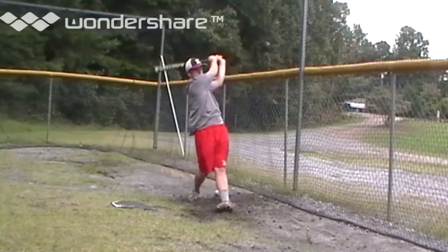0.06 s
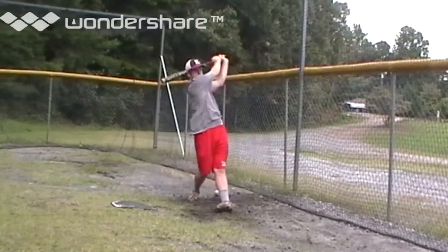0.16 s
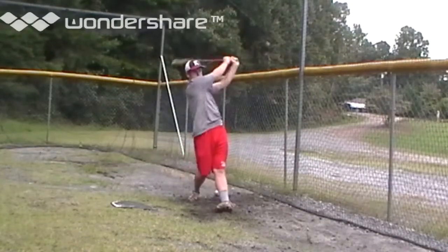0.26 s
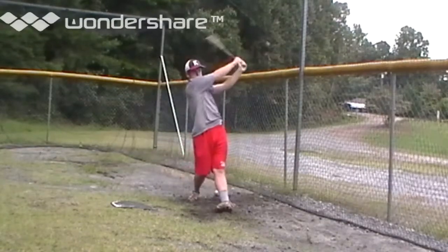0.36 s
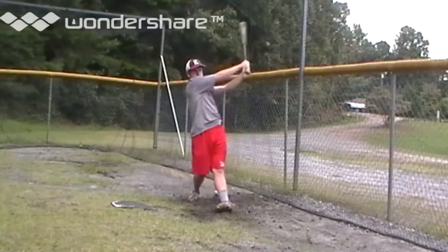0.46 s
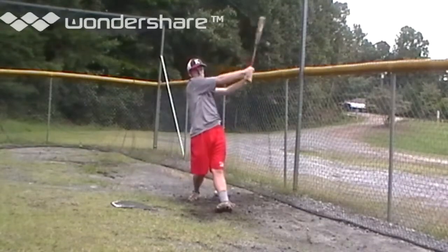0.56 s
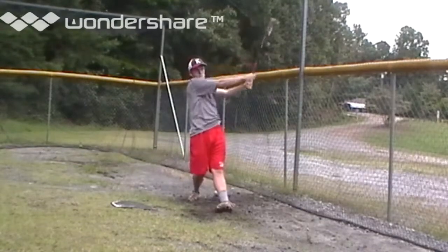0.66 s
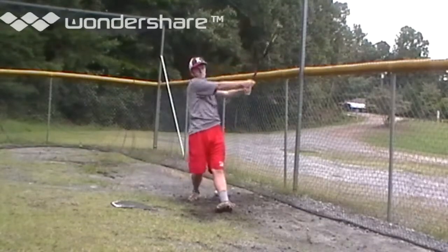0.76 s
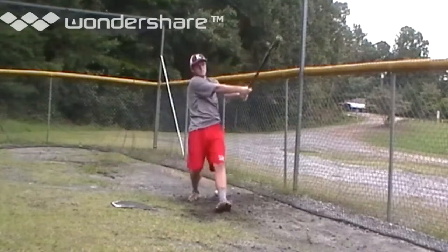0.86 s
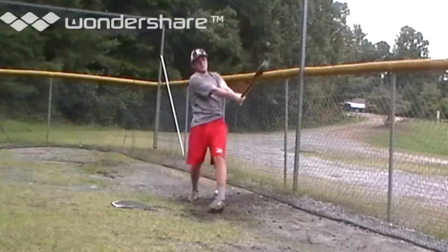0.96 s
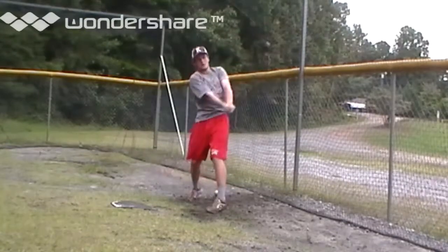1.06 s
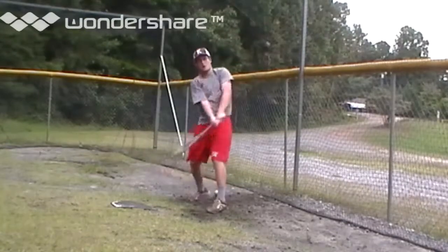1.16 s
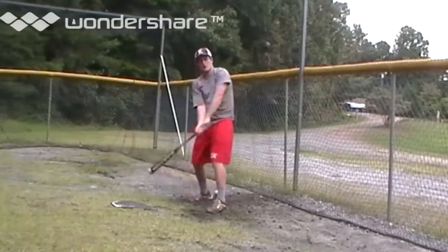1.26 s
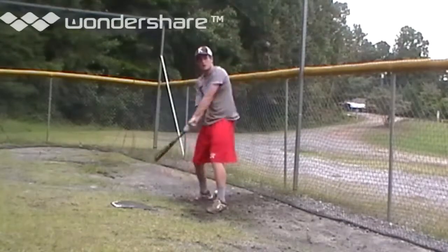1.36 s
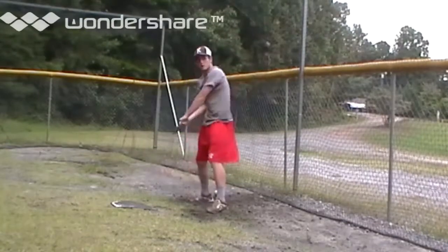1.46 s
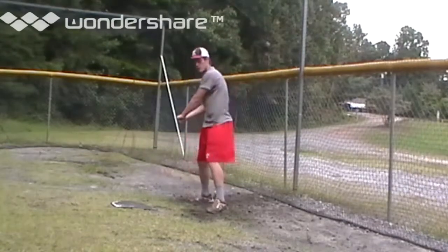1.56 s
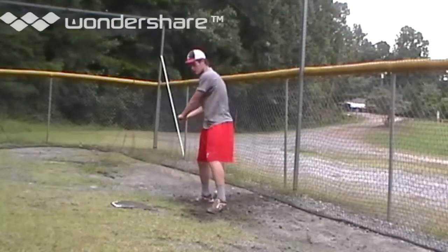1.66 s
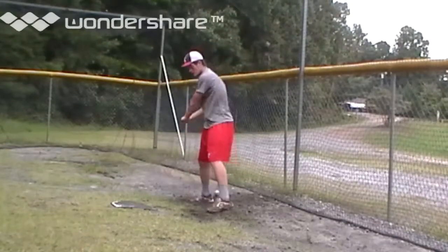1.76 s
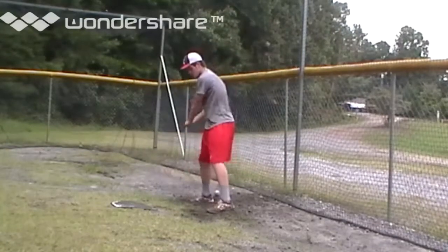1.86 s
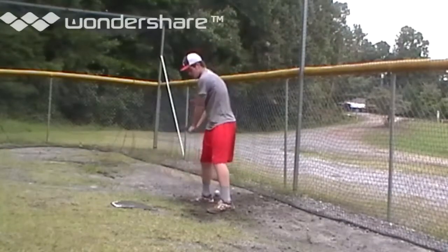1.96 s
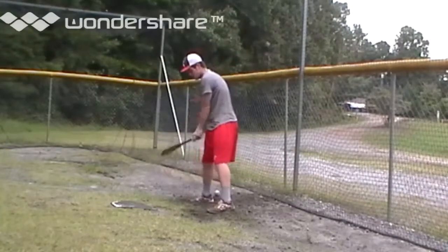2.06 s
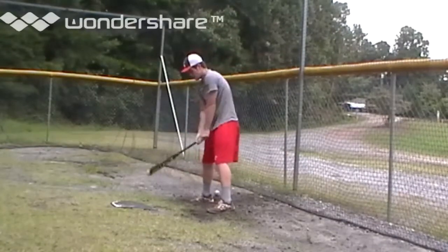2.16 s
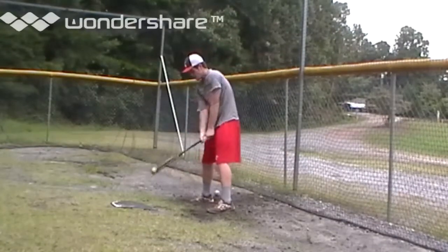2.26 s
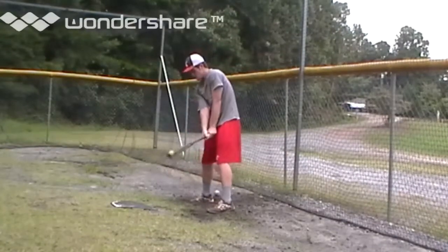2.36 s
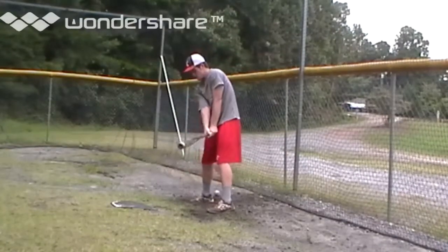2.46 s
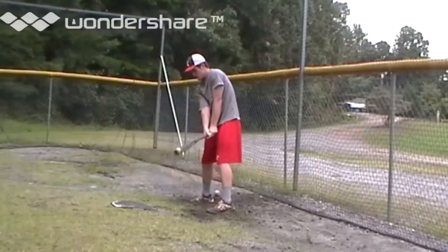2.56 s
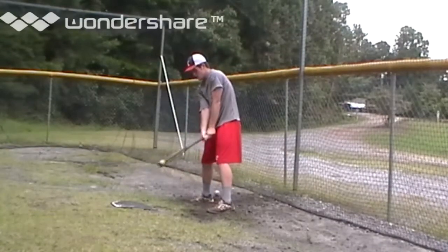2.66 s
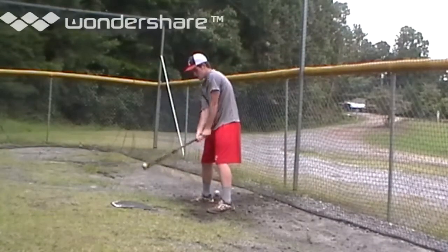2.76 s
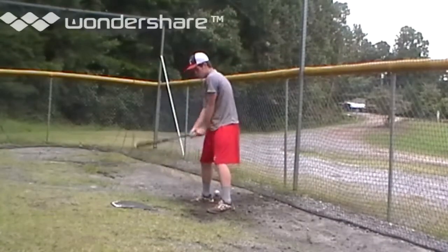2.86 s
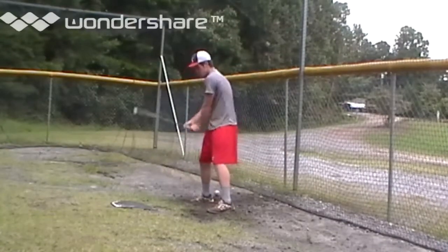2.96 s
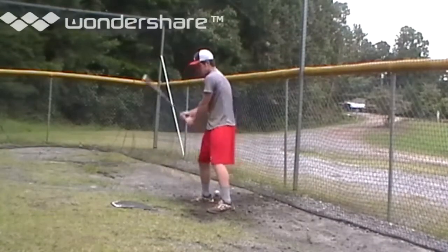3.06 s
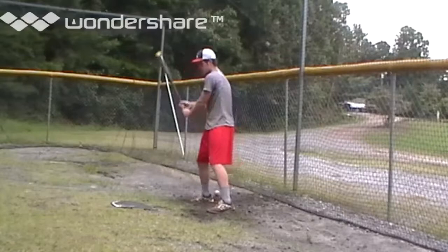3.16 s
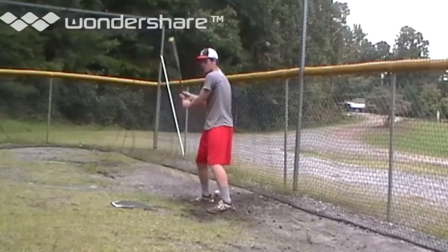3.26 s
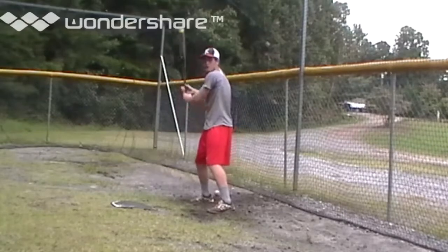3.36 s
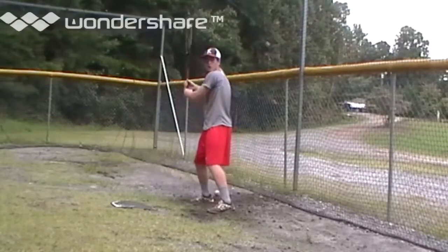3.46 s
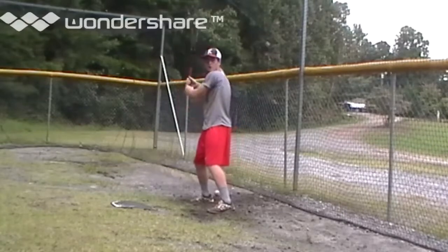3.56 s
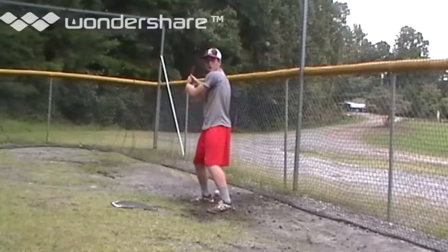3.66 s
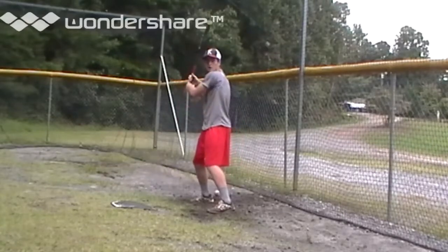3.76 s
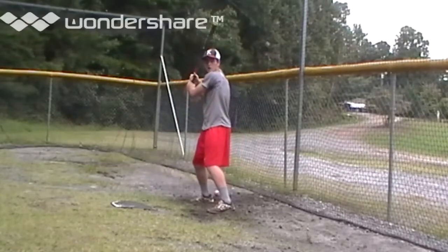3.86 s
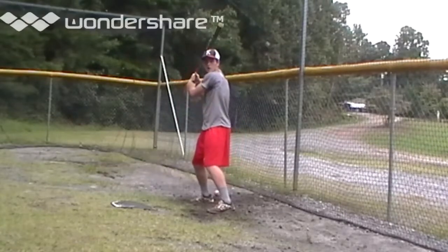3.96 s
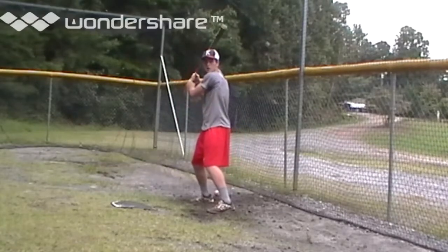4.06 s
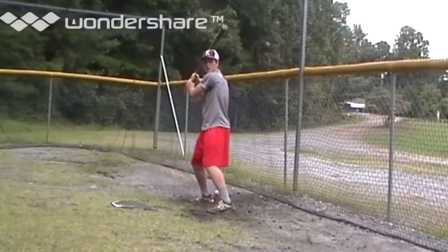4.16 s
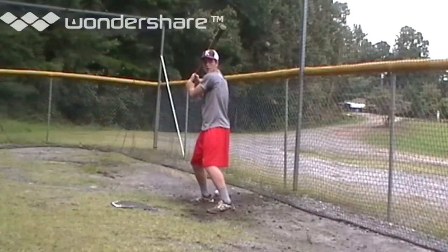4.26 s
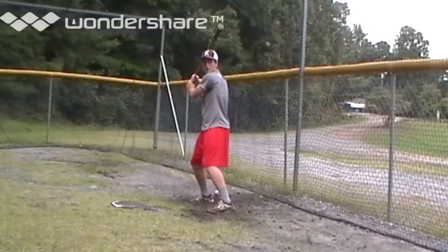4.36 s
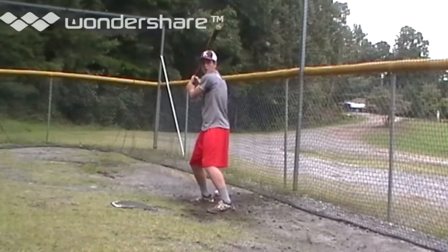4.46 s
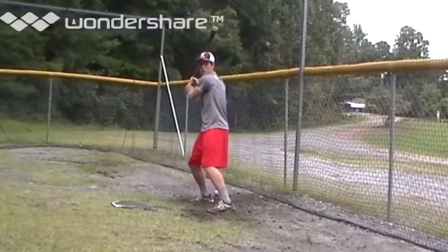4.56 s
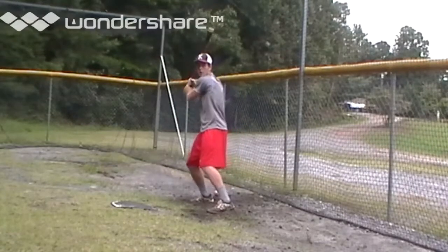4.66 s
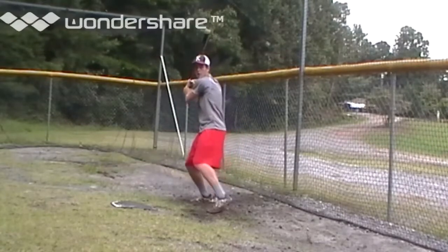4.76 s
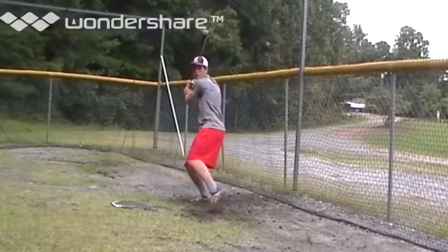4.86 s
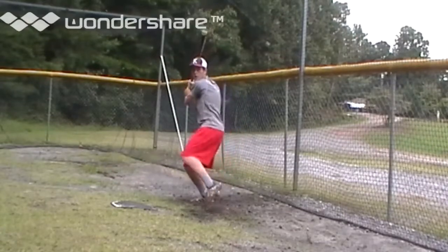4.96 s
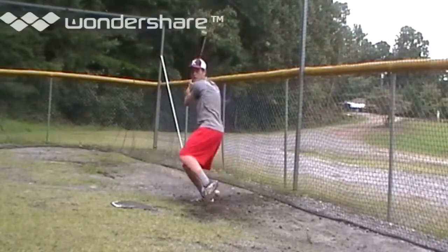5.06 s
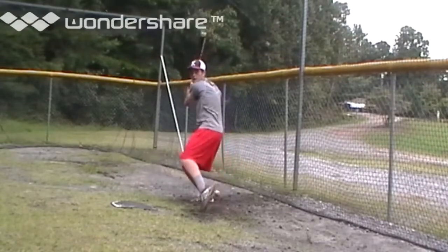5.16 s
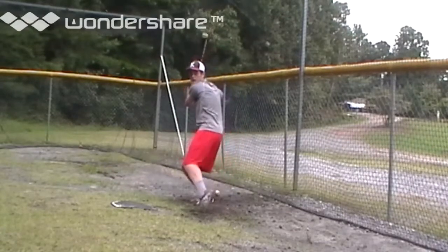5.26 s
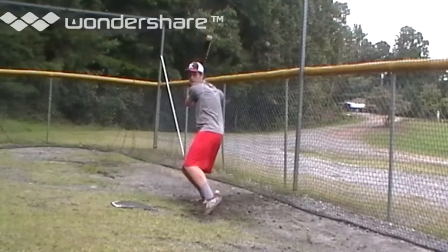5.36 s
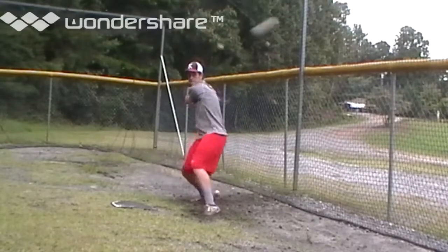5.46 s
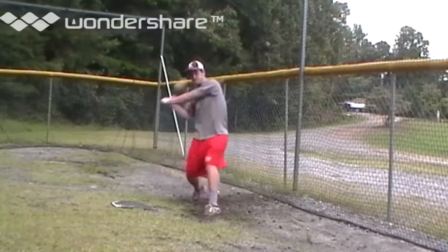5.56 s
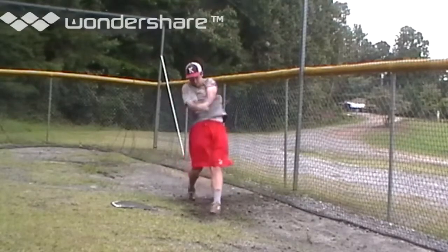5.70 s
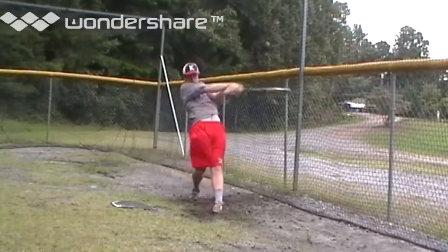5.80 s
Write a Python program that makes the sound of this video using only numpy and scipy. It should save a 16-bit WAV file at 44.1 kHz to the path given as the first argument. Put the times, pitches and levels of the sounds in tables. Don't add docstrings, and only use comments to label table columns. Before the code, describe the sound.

Outdoors by woods, a fading bat ring, one hard ball thud, gravelly footsteps, and a cricket chirping steadily over a far insect buzz.

```python
import sys
import numpy as np
from scipy import signal
from scipy.fft import rfft, irfft, next_fast_len
from scipy.io import wavfile
from scipy.ndimage import uniform_filter1d, minimum_filter1d

SR = 44100
rng = np.random.default_rng(int(sys.argv[2]) if len(sys.argv) > 2 else 0)


def output_pcm(signal):
    pcm = np.clip(np.atleast_2d(signal).T, -1, 1) * 32767
    wavfile.write(sys.argv[1], SR, np.round(pcm).astype(np.int16))


def elevation(decibels):
    levels = np.asarray(decibels, float)
    return 10 ** (levels / 20)


N = 257103

# (frequency [Hz], side minus mid [dB])
NEAR_WIDTH = [(60, -9), (150, -1), (380, -8.5), (950, -7), (2380, -8.5), (4400, -33), (8120, -38),
              (15000, 4)]
# (frequency [Hz], side minus mid [dB])
FAR_WIDTH = [(60, -7), (110, -8), (200, -9), (380, -3.5), (700, -3), (1290, -2), (2380, -1), (4400, -19),
             (8120, -26), (15000, 5)]


def rms_one(x):
    return x / np.sqrt(np.mean(x ** 2) + 1e-20)


def at_hz(points, hz):
    point_hz, db = np.array(points).T
    return np.interp(np.log(hz + 1), np.log(point_hz), db)


def noise_pair():
    return rng.standard_normal((2, N))


def band_pass(x, low_hz, high_hz):
    return signal.sosfilt(signal.butter(2, [low_hz, high_hz], "band", fs=SR, output="sos"), x)


def left_right(db):
    return elevation(np.array([[db], [-db]]) / 2)


def drift(rate_hz):
    r = np.exp(-80 * np.pi * rate_hz / SR)
    settle = 2000
    slow = signal.lfilter([1], [1, -2 * r, r * r], rng.standard_normal(N // 40 + 2 + settle))[settle:]
    return np.interp(np.arange(N) / 40, np.arange(len(slow)), rms_one(slow))


def colour(pair, gain, width):
    # (frequency [Hz], left minus right [dB])
    leaning = [(60, -1.0), (150, 1.0), (380, 2.5), (950, 1.5), (2380, 0.0), (5980, 1.0), (15000, 0.5)]
    size = next_fast_len(N)
    hz = np.arange(size // 2 + 1) * SR / size
    mid, side = rfft(pair, size) * gain(hz)
    both = mid + elevation(at_hz(width, hz)) * side * [[1], [-1]]
    both = both * elevation(at_hz(leaning, hz) / 2 * [[1], [-1]])
    return rms_one(irfft(both, size)[:, :N])


def humps(modes):
    return lambda hz: sum(elevation(db) / (1 + (2 * (hz - top) / width) ** 2) for top, width, db in modes)


def grains(per_s, spread_db):
    sizes = elevation(spread_db * np.minimum(rng.exponential(1, (2, N)), 4)) * noise_pair()
    return sizes * (rng.random((2, N)) < per_s / SR) + 0.34 * noise_pair()


def pitched(clicks, low_hz, high_hz, cycles, patchy_db):
    out, size = 0, clicks.shape[1]
    dealt = rng.integers(0, 14, size)
    for k, hz in enumerate(np.geomspace(low_hz, min(high_hz, .4 * SR), num=14)):
        r = elevation(-60 * hz / (cycles * SR))
        w = 2 * np.pi * hz / SR
        mine = clicks * (dealt == k) * elevation(patchy_db * drift(13.0)[:size])
        ringing = signal.lfilter([1, 0, -1], [1, -2 * r * np.cos(w), r * r], mine)
        out = out + rms_one(ringing) * np.sqrt(hz)
    return out


def trees(x, t60, low_hz, high_hz):
    t = np.arange(int(.5 * SR)) / SR
    tail = rng.standard_normal((2, len(t))) * elevation(-60 * t / t60) * np.clip(t / 0.0034, 0, 1)
    mid, side = band_pass(tail, low_hz, high_hz)
    tail = mid + 0.42 * side * np.array([[1], [-1]])
    return signal.fftconvolve(x[None], tail / np.sqrt(np.sum(tail ** 2) / 2), axes=1)[:, :N]


def loudest(*levels_db):
    return 10 * np.log10(sum(elevation(2 * db) for db in levels_db))


def dying(flash_db, held_db, until, fall, tail_db):
    t = np.minimum(np.arange(N) / SR, 1)
    flash = flash_db - 1100 * t
    held = held_db - fall * np.maximum(t - until, 0)
    return loudest(flash, held, tail_db - 15.5 * t)


def aftermath():
    # (frequency [Hz], width [Hz], level [dB])
    ping_modes = [
        (1210, 30, -7),
        (1474, 83, 4),
        (2956, 150, 0),
        (3366, 52, 1),
        (3720, 190, -5),
        (4170, 240, -5.5),
        (5370, 320, -23),
    ]
    # (frequency [Hz], level per Hz [dB])
    rattle_spectrum = [(130, -51), (220, -13.5), (700, -12), (765, -14), (1480, -5.5), (2350, -11.5),
                       (2960, -7), (4610, -15), (13000, -22), (15500, -33)]
    rattle_edges = 0, 2300, 6000, 20000
    # (first flash [dB], held level [dB], held until [s], release [dB/s], tail [dB])
    decays = [
        (-30, -36, 0.11, 43, -66),
        (-21.5, -34.5, 0.13, 73, -49.5),
        (-24, -40.5, 0.16, 128, -58.5),
        (-34, -35, 0.18, 126, -53),
    ]
    low_db, high_db, hiss_db, line_db = (dying(*row) for row in decays)
    links = pitched(grains(25000, 0.42)[:, :SR], low_hz=253, high_hz=14600, cycles=4.2, patchy_db=2.0)
    part = np.sqrt(SR / N)
    out = 0
    for low, high, db in zip(rattle_edges, rattle_edges[1:], (low_db + 0.5, high_db + 0.26, hiss_db - .8)):
        band = colour(links, lambda hz: elevation(at_hz(rattle_spectrum, hz)) * (hz >= low) * (hz < high), NEAR_WIDTH)
        out = out + part * elevation(db) * band
    lines = (ping_modes[:2], low_db - 8.5), (ping_modes[2:3], line_db - 4), (ping_modes[3:], high_db - 5.5)
    for modes, db in lines:
        out = out + elevation(db + 2.0 * drift(57)) * colour(noise_pair(), humps(modes), NEAR_WIDTH)
    t = np.arange(N) / SR
    rise = np.clip(.25 + t / .004, 0, 1)
    still = np.clip((0.76 - t) / 0.041, 0, 1)
    return rise * still * out


def returns():
    # (time [s], length [s], frequency [Hz], peak level [dB])
    echoes = [(0, 0.0077, 5300, -25), (0, .008, 6500, -29), (0, 0.024, 3980, -36), (0, .03, 3000, -29),
              (.025, 0.033, 2980, -33), (.029, 0.012, 4170, -27), (.04, 0.047, 4175, -37),
              (.033, 0.017, 1445, -35), (.056, 0.033, 1214, -35), (.071, 0.0096, 2990, -25),
              (.085, 0.01, 3010, -21.5), (.096, .01, 4100, -29), (.097, 0.03, 3010, -39),
              (.1, 0.017, 1506, -31.5), (.114, 0.019, 1452, -32), (.117, 0.007, 9600, -33.5),
              (.141, 0.0091, 7840, -38), (.143, .012, 13200, -41), (.144, 0.036, 3014, -33),
              (.168, 0.029, 11100, -50), (.171, .013, 3005, -28), (.183, 0.022, 1460, -43),
              (.187, 0.02, 3010, -29), (.189, .008, 9700, -51), (.207, 0.0077, 13100, -40),
              (.212, .011, 2980, -38), (.226, .009, 3000, -36), (0.7827, 0.0017, 2750, -24),
              (.7843, 0.0024, 5440, -23.5), (0.7845, 0.0012, 4050, -22.5), (.7848, 0.001, 8500, -29),
              (0.784, 0.0014, 6640, -27.5), (5.648, 0.0028, 1110, -23), (5.655, .014, 700, -39),
              (5.717, .003, 1310, -34)]
    out, wobble, rough = np.zeros(N), drift(90), drift(200)
    for s, length, hz, db in echoes:
        at, u = round(s * SR), np.linspace(0, 1, round(length * SR))
        here = slice(at, at + len(u))
        phase = 2 * np.pi * np.cumsum(hz * (1 + 0.0044 * wobble[here])) / SR
        swell = np.sin(np.pi * u ** 0.83) ** 0.71
        out[here] += elevation(db + 1.4 * rough[here]) * swell * np.sin(phase)
    return out + elevation(-22) * trees(out, t60=.06, low_hz=1000, high_hz=14000)


def air():
    # (frequency [Hz], level per Hz [dB])
    air_spectrum = [(15, -61), (25, -32.5), (86, -2), (113, 0), (215, -2), (399, -17), (469, -15),
                    (2420, -34.5), (3620, -32), (4260, -42), (4740, -34), (6040, -18), (6910, -29),
                    (7690, -41), (15500, -45.5)]
    breath = elevation(-49.5 + 0.84 * drift(0.22))
    return breath * colour(noise_pair(), lambda hz: elevation(at_hz(air_spectrum, hz)), FAR_WIDTH)


def chorus():
    # (frequency [Hz], width [Hz], level [dB])
    buzz_modes = [
        (6120, 310, 1),
        (6780, 290, -6),
        (5880, 2700, -10.5),
    ]
    # (frequency [Hz], width [Hz], level [dB], drop between phrases [dB])
    sung_lines = [
        (6020, 45, -3, 17),
        (6110, 52, -7.5, 6),
    ]
    phrase_middles = [.2, .6, .98, 1.35, 1.76, 2.18, 2.54, 2.93, 3.285, 3.69, 4.1, 4.5, 4.86, 5.25, 5.63]
    phrase_s, edge_s = 0.18, 0.04
    throb = np.sin(2 * np.pi * np.cumsum(31 + 1.5 * drift(3)) / SR)
    t, middles = np.arange(N) / SR, np.array(phrase_middles)
    since = t - middles[np.searchsorted((middles[1:] + middles[:-1]) / 2, t)]
    rest = np.clip((np.abs(since) - phrase_s / 2) / edge_s + .5, 0, 1)
    buzz = colour(grains(6000 * elevation(5.7 * throb), 3.7), humps(buzz_modes), FAR_WIDTH)
    out = elevation(-1.5 + 0.19 * drift(4.2)) * buzz
    for hz, width, db, rest_db in sung_lines:
        swell_db = 2.0 * throb + 1.1 * drift(13) - rest_db * rest
        out = out + elevation(db + swell_db) * colour(noise_pair(), humps([(hz, width, 0)]), FAR_WIDTH)
    solo = np.sin(2 * np.pi * np.cumsum(5630 + 304 * since + 18 * drift(39.4)) / SR)
    solo_db = -3 + 2.2 * throb + 3.1 * drift(11) - 15 * rest
    return elevation(-57) * (out + elevation(solo_db) * solo)


def hum():
    # (time [s], level [dB])
    motor_levels = [(0.0, -58), (0.5, -50.5), (0.55, -70), (0.99, -46), (1.38, -53.5), (1.69, -47.5),
                    (1.82, -51), (3.12, -64), (3.18, -77), (3.28, -51.5), (3.54, -65), (4.27, -64),
                    (4.37, -50), (4.71, -67), (4.74, -58), (5.41, -54.5), (5.57, -63), (5.83, -49)]
    s, db = np.transpose(motor_levels)
    level_db = np.interp(np.arange(N) / SR, s, db) - .1
    line = np.sqrt(2) * np.sin(2 * np.pi * np.cumsum(119.8 + 1.86 * drift(3.0)) / SR)
    return elevation(level_db) * line * left_right(1.2)


def vehicle():
    fade_s, centre_hz, width_hz = 2.9, 225.5, 165
    gone = np.clip(1 - (np.arange(N) / SR / fade_s) ** 3.1, 0, 1)
    return elevation(-57) * gone * colour(noise_pair(), humps([(centre_hz, width_hz, 0)]), NEAR_WIDTH)


def rustles():
    # (time [s], length [s], frequency [Hz], rms level [dB])
    grit_snaps = [(.158, .003, 7000, -34), (.164, 0.0027, 6500, -40), (.1965, .002, 12500, -38),
                  (1.796, 0.0032, 5000, -46), (1.829, .003, 3500, -46), (5.126, 0.0034, 1400, -46),
                  (5.149, 0.0027, 1590, -42.5), (5.208, .002, 2200, -48), (5.24, 0.0016, 2600, -50),
                  (5.385, 0.0015, 2600, -41.5), (5.417, .002, 2800, -47), (5.4435, 0.0018, 2500, -45),
                  (5.565, 0.013, 2300, -54), (5.698, 0.0083, 3800, -55), (5.738, 0.012, 1290, -48),
                  (5.794, 0.0018, 2800, -39), (5.824, 0.0058, 1500, -40), (5.612, 0.042, 1250, -47.5),
                  (5.652, 0.014, 1500, -53), (5.651, 0.015, 900, -40), (5.678, .014, 800, -48),
                  (5.8, 0.0073, 1300, -46), (5.662, .006, 2570, -55), (.404, 0.0064, 4140, -40),
                  (.575, 0.0051, 8000, -59), (1.592, .002, 7000, -56), (3.5625, 0.0013, 4970, -41),
                  (5.372, 0.0023, 1800, -45), (5.4, .002, 2000, -49), (5.43, .002, 1500, -50),
                  (5.705, .002, 2600, -48), (5.765, .002, 1500, -48), (5.817, 0.0018, 2000, -45),
                  (5.797, 0.0088, 810, -43), (2.516, 0.0047, 1900, -53), (3.632, .004, 1680, -51),
                  (5.444, 0.0044, 1800, -52), (5.588, 0.0044, 1350, -43), (5.719, 0.0034, 1600, -57),
                  (5.748, 0.0038, 1500, -54), (.604, .004, 8000, -59), (.643, 0.0032, 8000, -54),
                  (5.812, .018, 1210, -55)]
    # (time [s], length [s], frequency [Hz], rms level [dB])
    soft_rustles = [(.799, 0.041, 477, -48), (.895, 0.054, 201, -55), (5.362, 0.0095, 282, -47.5),
                    (.864, 0.017, 413, -46), (.922, .022, 444, -62), (1.044, 0.27, 513, -70),
                    (1.273, 0.084, 2840, -56), (1.375, 0.023, 3600, -48.5), (2.398, 0.035, 2940, -59.5),
                    (5.118, 0.059, 1350, -51), (5.343, 0.052, 308, -51.5), (5.624, 0.015, 397, -40.5),
                    (5.639, 0.0079, 516, -42), (5.652, 0.015, 1210, -40), (5.657, 0.0069, 770, -37),
                    (5.662, 0.0088, 645, -31)]
    # (time [s], length [s],
    # frequency [Hz], rms level [dB])
    link_chinks = [(.406, 0.0048, 2000, -34.5), (.55, .45, 1470, -59), (1.268, 0.052, 1690, -53),
                   (.573, .006, 4470, -49.5), (.601, 0.0085, 4470, -50), (.641, 0.0035, 4250, -47),
                   (1.012, 0.0049, 4050, -51), (1.29, 0.025, 2630, -59), (5.144, 0.12, 3900, -56),
                   (5.243, .0056, 3600, -56), (5.38, 0.0028, 3680, -38), (5.385, 0.0052, 3660, -40),
                   (2.184, .008, 3440, -57), (5.418, 0.004, 3760, -45), (5.755, 0.014, 8000, -52),
                   (5.796, 0.0082, 4100, -41)]
    out, source = np.zeros((2, N)), grains(13000, 2.8)
    lead = 500
    for rows, share in ((grit_snaps, 0.6), (soft_rustles, 0.27), (link_chinks, 0.13)):
        for s, length, hz, db in rows:
            at, size, width = round(s * SR), round(length * SR), share * hz
            low, high = max(hz - width / 2, 50), min(hz + width / 2, .45 * SR)
            mid, side = band_pass(source[:, at - lead:at + size], low, high)[:, lead:]
            burst = rms_one(mid + elevation(at_hz(NEAR_WIDTH, hz)) * side * [[1], [-1]])
            swell = np.sin(np.pi * np.linspace(0, 1, size) ** 0.99) ** 0.39
            out[:, at:at + size] += elevation(db) * burst * swell
    return out * left_right(1.8)


def strokes():
    # (first full stroke [s], time to last stroke [s], level [dB])
    chirp_times = [(0.189, .0757, -40), (1.2946, 0.078, -38.5), (1.8032, 0.074, -38), (2.2556, 0.076, -39),
                   (2.772, 0.077, -39), (3.1857, 0.077, -39), (3.631, 0.077, -38.5), (4.103, 0.076, -39.5),
                   (4.5364, 0.073, -39), (4.923, 0.075, -39), (5.3247, 0.077, -39), (5.7175, .0786, -39)]
    # (share of the span, level [dB], top pitch [Hz], length [s])
    full_strokes = [
        (0, .5, 4376, .021),
        (0.479, 1.5, 4410, 0.022),
        (1.005, 2, 4416, 0.022),
    ]
    # (time [s], level [dB], top pitch [Hz], length [s])
    short_strokes = [(1.267, -46, 4250, 0.017), (1.753, -53, 4070, 0.0065), (1.775, -43, 4220, .013),
                     (2.206, -57, 4120, .006), (2.23, -47, 4200, 0.0084), (2.745, -44, 4230, 0.014),
                     (3.135, -50, 4120, .007), (3.158, -44, 4250, 0.011), (3.577, -50, 4150, 0.0071),
                     (3.601, -44.5, 4240, 0.015), (4.048, -49, 4120, .007), (4.072, -44.5, 4230, 0.014),
                     (4.485, -49, 4120, 0.0065), (4.506, -46.5, 4250, .014), (4.873, -51, 4140, .007),
                     (4.895, -48, 4200, 0.0096), (5.279, -53, 4100, .006), (5.297, -46, 4230, 0.015),
                     (5.667, -55, 4160, 0.0093), (5.692, -49, 4180, .011)]
    full = [(s + share * span, db + more_db, hz, length)
            for s, span, db in chirp_times for share, more_db, hz, length in full_strokes]
    return short_strokes + full


def cricket():
    out = np.zeros(N + 2000)
    for s, db, hz, length in strokes():
        u = np.arange(int(length * SR)) / (length * SR)
        sag = np.where(u < .5, 1050, 1900) * (u - .5) ** 2
        phase = 2 * np.pi * np.cumsum(hz + 30 - sag) / SR
        weaker = 1 - 0.4 * np.clip((u - .7) / .1, 0, 1)
        shape = np.sin(np.pi * u ** 0.96) ** .62 * weaker
        third = elevation(-26.5) * np.sin(np.pi * u) ** 4.0 * np.sin(3 * phase)
        at = round((s - .003) * SR)
        out[at:at + len(u)] += elevation(db) * shape * (np.sin(phase) + third)
    out = out[:N]
    delay_s = .017
    late = np.roll(out, round(delay_s * SR)) * (np.arange(N) > SR * delay_s)
    near = trees(late, t60=0.08, low_hz=3800, high_hz=6350)
    far = trees(late, t60=.6, low_hz=4300, high_hz=4550)
    return out * left_right(.8) + elevation(-19) * near + elevation(-28) * far


def blow(hz, crack_db, t60):
    t = np.arange(4000) / SR
    late = np.maximum(t - .0009, 0)
    phase = 2 * np.pi * hz * (late + 0.00065 * (1 - np.exp(-late / 0.0018)))
    swell = np.clip(late * hz / .5, 0, 1) ** 1.8
    overtone = 0.28 * np.sin(2.103 * phase) * elevation(-75 * late / t60)
    body = -swell * (np.sin(phase) * elevation(-60 * late / t60) + overtone)
    noise = band_pass(rng.standard_normal(len(t)), 1800, 6600)
    crack = noise * np.clip(t / .0012, 0, 1) * elevation(-60 * np.maximum(t - .0018, 0) / .006)
    return body / np.abs(body).max() + elevation(crack_db - 3) * crack


def knocks():
    # (time [s], peak level [dB], body [Hz], crack [dB], t60 [s])
    ball_thuds = [
        (0.531, -38, 380, -16, 0.033),
        (0.7839, -9.5, 305, -12, 0.014),
        (0.805, -30, 250, -25, 0.03),
        (0.821, -31, 265, -25, 0.03),
        (.839, -33, 255, -25, .03),
        (.8595, -29, 330, -24, .04),
        (.921, -38, 400, -22, .025),
        (.931, -35, 290, -24, .025),
    ]
    # (time [s], peak level [dB], body [Hz], crack [dB], left minus right [dB])
    stone_knocks = [(0.404, -28, 725, 2.5, -7), (0.713, -55, 608, 1.5, -2.5), (1.011, -55, 510, -12, -5),
                    (1.054, -42, 533, -15, 2.0), (1.099, -36, 605, -17, 5), (1.197, -31, 620, -25, 2),
                    (1.204, -33, 560, -25, 3.0), (1.591, -37.5, 690, -4, -6), (1.679, -36.5, 590, -27, 2.5),
                    (1.69, -31.5, 805, -28, 2.5), (1.789, -45, 516, 13, -5), (1.834, -35.5, 477, 3, -3),
                    (1.849, -45, 650, -16, -9), (1.972, -44, 1050, -14, -1), (3.971, -48, 509, -12, -2),
                    (5.099, -43, 720, -14, -4), (5.239, -47, 1380, 3, 4), (5.384, -50, 530, 10, 3),
                    (5.683, -36, 706, -18, 3.0), (5.747, -33.5, 726, -24, 4), (5.796, -31.5, 660, -16, 5)]
    # (time [s], peak level [dB], body [Hz], crack [dB])
    batter_stamps = [
        (2.515, -38, 620, -9),
        (3.631, -35, 650, -10),
        (5.443, -33, 650, -7),
        (5.5705, -36, 1150, -12),
        (5.587, -28, 800, -16),
        (5.5893, -27, 520, -24),
        (5.6471, -17, 800, -26),
        (5.7175, -27, 800, -20),
        (5.828, -22, 650, -16),
    ]
    blows = [(*row, 4.5) for row in ball_thuds]
    blows += [(*row, 0.016, pan_db) for *row, pan_db in stone_knocks]
    blows += [(*row, .008, 3.2) for row in batter_stamps]
    out = np.zeros((2, N + 4000))
    for s, db, hz, crack_db, t60, pan_db in blows:
        at = round(s * SR)
        out[:, at:at + 4000] += elevation(db) * left_right(pan_db) * blow(hz, crack_db, t60)
    out = signal.sosfilt(signal.butter(2, 170, "high", fs=SR, output="sos"), out[:, :N])
    return out + elevation(-19.0) * trees(out.mean(axis=0), t60=0.32, low_hz=192, high_hz=5000)


def drags():
    # (loudest time [s], level [dB], spread [s], bright part [dB])
    shoe_drags = [(.52, -55, .05, -69), (0.719, -41.5, 0.012, -52), (0.788, -27, 0.0058, -37),
                  (.88, -50.5, 0.37, -57.5), (1.1, -51, 0.062, -61), (1.26, -47.5, 0.13, -58.5),
                  (1.41, -48.5, 0.064, -60), (1.6, -56, 0.49, -67.5), (1.839, -41, 0.035, -54),
                  (1.981, -54.5, 0.071, -68), (1.0, -61, 0.068, -65), (2.12, -57, 0.14, -68),
                  (5.172, -49.5, 0.12, -63), (5.41, -46.5, 0.12, -61), (5.6, -50.5, 0.071, -70),
                  (5.72, -45.5, 0.11, -58.5), (5.83, -42, 0.051, -56)]
    t = np.arange(0, N, 32) / SR
    low, high = [-62.5], [-74.5]
    for s, db, spread, bright_db in shoe_drags:
        loss = 11.5 * np.where(t < s, (s - t) / 0.92, t - s) / spread
        low.append(db - loss)
        high.append(bright_db - loss)
    return [np.interp(np.arange(N) / SR, t, loudest(*part)) for part in (low, high)]


def scuffs():
    # (frequency [Hz], level per Hz [dB])
    gravel_spectrum = [(180, -77), (300, 1), (2890, -11.5), (4020, -10.5), (4360, -15.5), (4710, -15),
                       (6060, -12.5), (7000, -12), (9100, -51), (15400, -120)]
    scuff_db, bright_db = drags()
    begun = np.clip((np.arange(N) / SR - .45) / 0.19, 0, 1)
    clicks = grains(5000 * elevation(3.0 * drift(31)), 1.9)
    pebbles = pitched(clicks, low_hz=350, high_hz=6500, cycles=4.4, patchy_db=2.0)
    low = colour(pebbles, lambda hz: elevation(at_hz(gravel_spectrum, hz)) * (hz > 250) * (hz < 7000), NEAR_WIDTH)
    high = colour(grains(9000, 2.2), lambda hz: (hz >= 7000) / (1 + (hz / 10000) ** 4), NEAR_WIDTH)
    return begun * (elevation(scuff_db - 0.5) * low + elevation(bright_db - 2.5) * high)


def birds():
    # (time [s], length [s], from [Hz], to [Hz], level [dB])
    seep_notes = [
        (1.94, 0.14, 7200, 7440, -62),
        (2.49, 0.17, 9300, 9050, -70),
    ]
    out, t = 0, np.arange(N) / SR
    for s, length, from_hz, to_hz, db in seep_notes:
        u = np.clip((t - s) / length, 0, 1)
        pitch = from_hz + (to_hz - from_hz) * u + 40 * drift(60)
        swell = elevation(db + 4.0 * drift(40)) * np.sin(np.pi * u ** 0.51)
        out = out + swell * np.sin(2 * np.pi * np.cumsum(pitch) / SR)
    return out


def scene():
    far = air() + chorus() + hum() + vehicle() + birds()
    near = aftermath() + returns() + rustles() + cricket() + knocks() + scuffs()
    return far + near


def roll_off(x):
    return signal.sosfilt(signal.butter(12, 15630, fs=SR, output="sos"), x)


def record(dry):
    height = np.abs(dry).max(axis=0)
    over_db = np.clip(20 * np.log10(height + 1e-9) + 14, 0, 4)
    ahead = minimum_filter1d(-over_db, size=260, origin=-129)
    early = np.append(ahead[210:], np.zeros(210)) * (height < .02)
    ducked = dry * elevation(5.5 * uniform_filter1d(early, size=40))
    return roll_off(0.61 * np.tanh(ducked / 0.59))


dry = scene()
out = record(dry)
output_pcm(out)
```